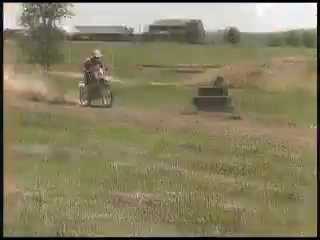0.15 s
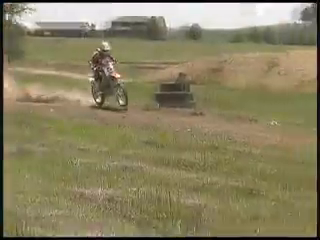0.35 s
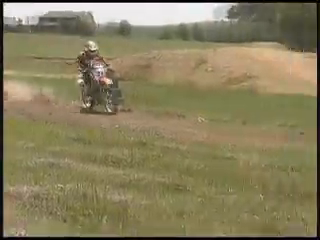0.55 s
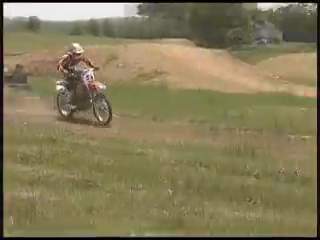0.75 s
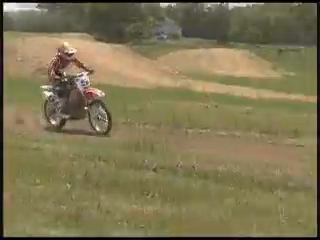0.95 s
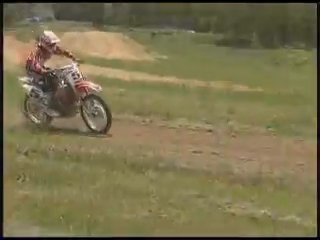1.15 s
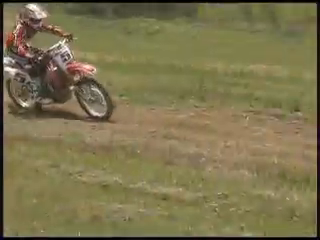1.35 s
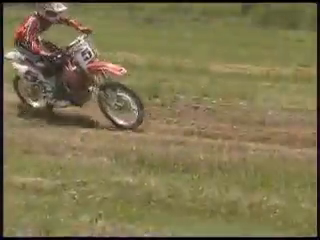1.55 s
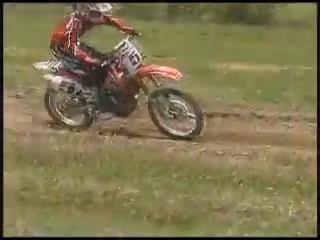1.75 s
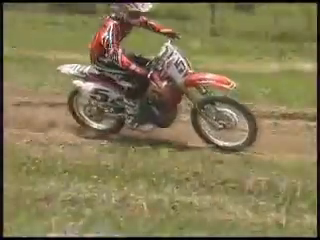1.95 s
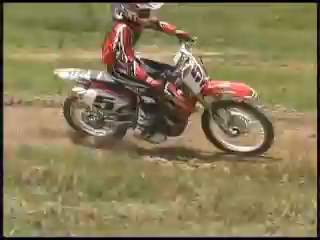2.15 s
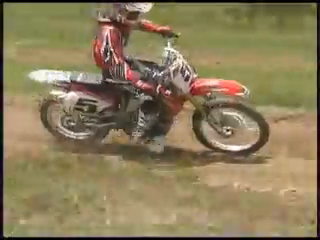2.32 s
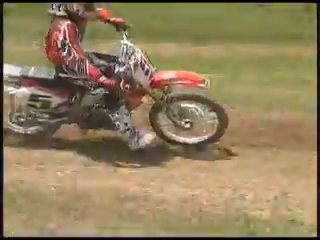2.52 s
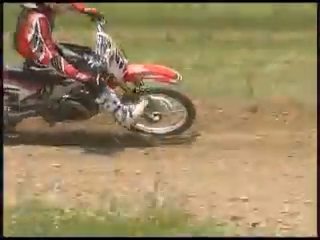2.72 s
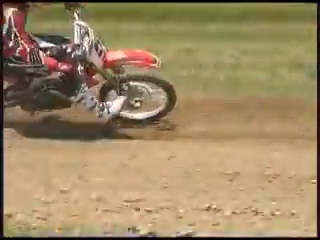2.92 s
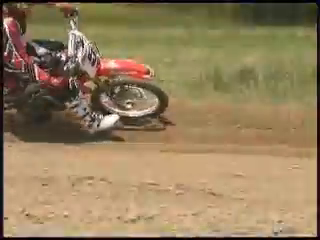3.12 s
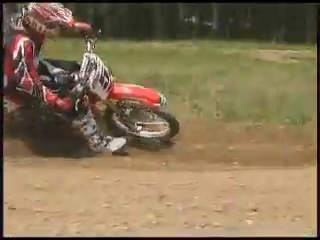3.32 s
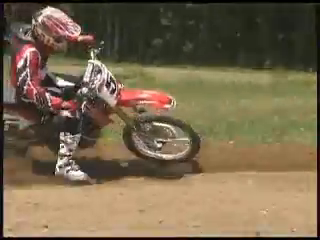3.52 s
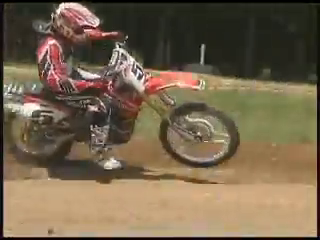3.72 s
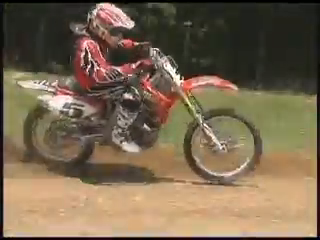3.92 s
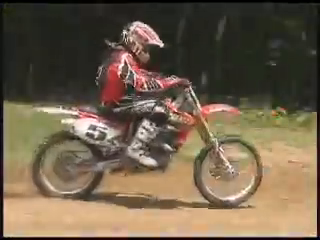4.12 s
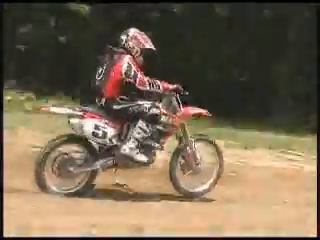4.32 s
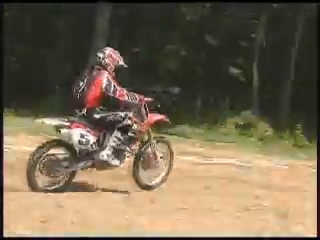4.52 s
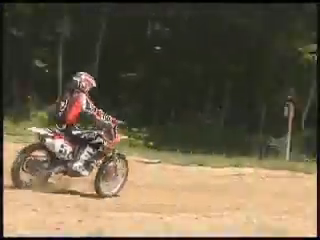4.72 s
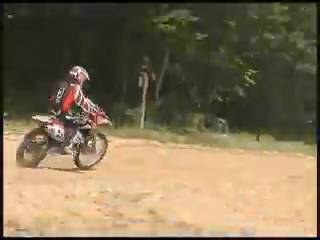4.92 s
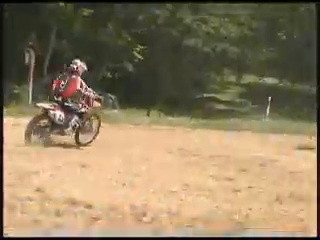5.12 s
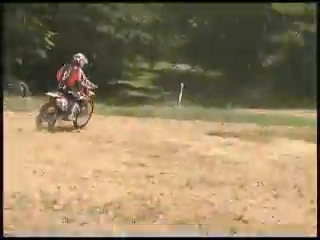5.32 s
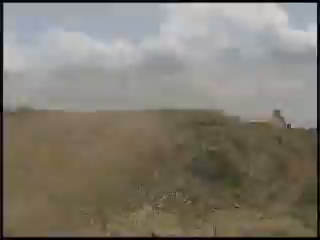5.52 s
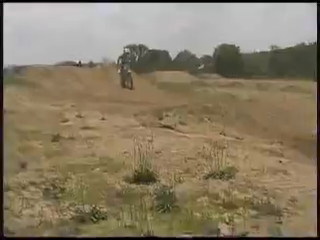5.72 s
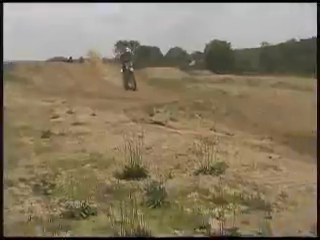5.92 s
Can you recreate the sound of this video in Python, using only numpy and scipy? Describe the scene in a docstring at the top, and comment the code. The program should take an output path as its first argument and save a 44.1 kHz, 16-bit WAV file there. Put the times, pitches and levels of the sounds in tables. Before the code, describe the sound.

A dirt bike engine snarls, drops to a low putter, then barks loudly close by as it pulls away outdoors.

```python
"""Dirt bike on the track

A four-stroke single idles under a shed; the boom fades as the bike comes on under throttle. It coasts
past with its chain slapping, opens up out of a turn, shuts off, then is suddenly close and pulling again.
Every firing is a thump in the exhaust pipe, a sharp bark of gas and a snarl from the tailpipe;
intake, chain and valve gear rush in between."""
import sys
import numpy as np
from scipy import signal
from scipy.fft import rfft, irfft, next_fast_len
from scipy.io import wavfile
from scipy.ndimage import uniform_filter1d

SR = 44100
rng = np.random.default_rng(int(sys.argv[2]) if len(sys.argv) > 2 else 0)


def pcm_store(signal):
    """Save signal as 16-bit PCM."""
    levels = np.round(np.clip(np.atleast_2d(signal), -1, 1) * 32767)
    wavfile.write(sys.argv[1], SR, levels.astype(np.int16).T)


N = 262836
TIME = np.arange(N) / SR

# Twists of the throttle. Each row: opening and shutting time in seconds, lift of the pipe's boom in Hz.
THROTTLE_TWISTS = [(-.05, 0.621, 43), (0.691, 0.807, 48), (2.788, 5.221, 46), (5.67, 6.1, 25)]
OPEN_S, SHUT_S = 0.0077, 0.035
COAST_FIRING_HZ = 50  # reference speed for coasting levels and pitch


def from_db(db):
    """Decibels to gain."""
    return 10 ** (np.asarray(db) / 20)


def in_time(rows):
    """The columns of a curve at every sample."""
    s, *columns = np.transpose(rows)
    return [np.interp(TIME, s, c) for c in columns]


def in_frequency(rows):
    """The columns of a spectrum at every bin of a transform padded to twice the length."""
    hz, *columns = np.transpose(rows)
    bins = np.fft.rfftfreq(next_fast_len(2 * N), 1 / SR)
    return [np.interp(np.log(bins + 1), np.log(hz + 1), c) for c in columns]


def filtered(x, response):
    """Apply a frequency response."""
    size = next_fast_len(2 * N)
    return irfft(rfft(x, size) * response, size)[..., :N]


def coloured(x, spectrum):
    """Give white sound a spectrum and keep its power."""
    gain = from_db(in_frequency(spectrum)[0])
    return filtered(x, gain / np.sqrt(np.mean(gain ** 2)))


def resonance(x, hz, width_hz):
    """Two-pole band-pass, gain 1 at the peak."""
    r = np.exp(-np.pi * width_hz / SR)
    feedback = [1, -2 * r * np.cos(2 * np.pi * hz / SR), r * r]
    return signal.lfilter(np.array([1, 0, -1]) * (1 - r * r) / 2, feedback, x + 1e-18)


def high_passed(x, edge_hz):
    """Roll off the lows below the edge."""
    return signal.sosfilt(signal.butter(4, edge_hz, "high", fs=SR, output="sos"), x)


def evened(x, size=3000):
    """Hold the short-term rms at 1."""
    power = uniform_filter1d(uniform_filter1d(x * x, size), size)
    return x / np.sqrt(np.maximum(power, 0) + 1e-14)


def shed_idle(firing_hz, level_db, top_hz, wash_db, wash_s, jitter_s=0.0029, count=10):
    """Slow firings boom on between slab and roof, each trailing a wash of reflections."""
    # Pipe and shed booming together. Each row: pitch in Hz, width in Hz, gain in dB.
    shed_modes = [(54.7, 7.8, -7), (109, 15, -8), (124.4, 15, 6), (159, 13, -30), (240, 25, -9.5)]
    starts = 0.005 + np.arange(count) / firing_hz + jitter_s * rng.standard_normal(count)
    fade = np.interp(starts, [0.065, 0.33], [1, 0])
    pulses = np.zeros(N)
    pulses[(np.abs(starts) * SR).astype(int)] = from_db(level_db) * fade
    wash = signal.lfilter([1], [1, -np.exp(-1 / (wash_s * SR))], pulses + 1e-18)
    pulses = pulses + from_db(wash_db) * wash * rng.standard_normal(N)
    boom = sum(from_db(db) * resonance(pulses, hz, width) * SR / (2 * np.pi * width)
               for hz, width, db in shed_modes)
    return signal.sosfilt(signal.butter(4, top_hz, fs=SR, output="sos"), boom)


def throttle():
    """0 shut, 1 open: it snaps open and closes a little slower."""
    return sum(np.clip(np.minimum((TIME - opens) / OPEN_S, (shuts - TIME) / SHUT_S) + .5, 0, 1)
               for opens, shuts, _ in THROTTLE_TWISTS)


def by_throttle(shut, wide_open):
    """Blend a quantity between coasting and pulling."""
    return shut + throttle() * (wide_open - shut)


def wheelspin():
    """The rear wheel breaks loose and the engine flares."""
    # Each row: centre in seconds, extra firings per second, width in seconds.
    flares = [(0.456, 8.0, 0.015), (0.578, 16.7, 0.028), (0.685, 11.4, 0.031), (3.343, 11.3, 0.043),
              (4.913, 10.8, 0.033), (5.111, 10.0, 0.033)]
    return sum(extra * np.exp(-.5 * ((TIME - s) / width) ** 2) for s, extra, width in flares)


def firing_rate():
    """Firings per second, wheelspin included."""
    # Engine speed while the tyre grips. Each row: time in seconds, firings per second.
    revs = [(0.0, 76.04), (0.812, 83.97), (0.904, 61.38), (1.459, 41.06), (1.888, 30.91), (1.956, 36.18),
            (2.328, 27.13), (2.739, 32.97), (2.885, 43.77), (3.115, 41.06), (3.359, 68.52), (3.61, 60.33),
            (3.854, 66.6), (4.178, 62.18), (4.351, 68.75), (5.179, 69.15), (5.345, 51.56), (5.675, 40.08),
            (5.677, 74.0), (5.83, 63.9), (5.96, 66.2)]
    return in_time(revs)[0] + wheelspin()


def engine_cycles():
    """Running count of four-stroke cycles."""
    # The bike's two entrances. Each row: time in seconds, starting point in the cycle from 0 to 1.
    entrances = [(0, .6), (5.675, .5)]
    cycles = np.cumsum(firing_rate()) / SR
    for s, phase in entrances:
        first = round(s * SR)
        cycles[first:] += phase - cycles[first] % 1
    return cycles


def firings(cycles, jitter_s):
    """Samples at which the cylinder fires, once every cycle."""
    at = np.flatnonzero(np.diff(np.floor(cycles)) > 0)
    return np.clip(at + (jitter_s * SR * rng.standard_normal(len(at))).astype(int), 0, N - 1)


def per_firing(cycles):
    """A new random value every cycle, joined by straight lines."""
    values = rng.standard_normal(int(cycles.max()) + 2)
    return np.interp(cycles, np.arange(len(values)), values)


def position():
    """Doublings of the distance from 10 m, and how far the tailpipe faces the microphone."""
    # Each row: time in seconds, distance in metres, tailpipe facing us from 0 to 1.
    path = [(0, 10, 0.6), (.8, 22.2, 0.03), (1.5, 10.06, 0.15), (2.7, 5.2, 0), (3.2, 4.9, 0),
            (4.1, 10.5, 1), (4.8, 11, 0.9), (5.67, 18, 1), (5.68, 7.5, 0.1)]
    metres, behind = in_time(path)
    return np.log2(np.maximum(metres, 1) / 10), np.clip(behind, 0, 1)


def layer_level(layer, pulling_db, fall_db=5):
    """Level in dB: set by effort under throttle, by speed and distance when coasting."""
    # Each layer: level in dB, dB per doubling of speed, dB added when heard from behind.
    coasting = {"bark": (-31.5, -4, -2.1), "rush": (-28.5, 9.2, -9.5), "boom": (-36.5, -1, -2.6),
                "drone": (-44.5, 0.31, .5)}
    db, speed_db, behind_db = coasting[layer]
    far, behind = position()
    speed = np.log2(firing_rate() / COAST_FIRING_HZ)
    return by_throttle(db + speed_db * speed - fall_db * far + behind_db * behind, pulling_db)


def boom_pitch(rate, pulling_hz=127.6, coasting_hz=142, settle_s=0.72):
    """The pipe's boom jumps with each gush of hot gas and settles; coasting, it sinks with the speed."""
    lift = np.zeros(N)
    for opens, _, rise_hz in THROTTLE_TWISTS:
        settling = np.exp(-np.abs((TIME - opens) / settle_s) ** 3)
        lift = np.where(TIME > opens - OPEN_S, rise_hz * settling, lift)
    return by_throttle(coasting_hz * (rate / COAST_FIRING_HZ) ** 0.23, pulling_hz + lift)


def thump(cycles, lead_s, drone_hz, drone_q, bottom_hz, top_hz, smear_hz, burble_s=0.00064, count=12):
    """The harmonics of the gas pulses sweep through the pipe's two resonances, boom and drone."""
    # Exhaust note with the throttle open. Each row: time in seconds, boom in dB, drone in dB.
    exhaust_levels = [(0.36, -34.5, -37.5), (0.8, -42.5, -46), (2.8, -25.5, -35.5), (3.29, -24.5, -25),
                      (3.65, -35.5, -33.5), (3.9, -37.5, -43), (4.06, -38, -34), (4.37, -33.5, -40.5),
                      (5.15, -38, -35.5), (5.68, -30, -24), (5.96, -37.5, -29)]
    rate = firing_rate()
    burble = 1 - throttle()  # coasting, timing and pitch turn uneven
    turn = np.exp(2j * np.pi * (cycles + (lead_s + burble_s * burble * per_firing(cycles)) * rate))
    boom_hz = boom_pitch(rate) * (1 + 0.054 * burble * per_firing(cycles))
    boom_q = by_throttle(10.5, 5.2)  # it rings longer when little gas flows
    puff_db = by_throttle(-29, -12)
    boom, drone, wave = 0, 0, 1
    for k in range(1, count + 1):
        hz, wave = k * rate, wave * turn
        # the open end radiates little bass, the silencer swallows the upper harmonics
        partial = wave / np.sqrt((1 + (bottom_hz / hz) ** 8) * (1 + (hz / (top_hz + rate / 2)) ** 20))
        boom += (partial / (1 + 1j * boom_q * (hz / boom_hz - boom_hz / hz))).real
        if k == 1:
            # the firing rate itself puffs straight out of the pipe
            boom += from_db(puff_db) * (1j * partial).real
        # the silencer's chambers delay each overtone differently, smearing the pulse into a hum
        smeared = partial * np.exp(-1j * ((hz - drone_hz) / smear_hz) ** 2)
        drone += (smeared / (1 + 1j * drone_q * (hz / drone_hz - drone_hz / hz)) ** 2).real
    boom_db, drone_db = in_time(exhaust_levels)
    boom = from_db(layer_level("boom", boom_db)) * evened(boom)
    drone = from_db(layer_level("drone", drone_db)) * evened(drone)
    return boom - drone


def snarl(at, peaks, pitch_hz, width_hz, size=300):
    """The steep pressure front of each firing rings a tailpipe resonance that moves with the throttle."""
    age, out = np.arange(size) / SR, np.zeros(N + size)
    for i, gain, hz in zip(at, peaks, pitch_hz[at]):
        out[i:i + size] += gain * np.sin(2 * np.pi * hz * age) * np.exp(-np.pi * width_hz * age)
    return out[:N]


def bark(at, gains, memory, rise_s, hold_s, decay_s, tail_db, tail_s, size=900):
    """The opening valve lets out a burst of turbulence; each burst partly resembles the one before."""
    # Each row: frequency in Hz, relative level in dB.
    gas_spectrum = [(250, -55), (420, -17), (944, -11.5), (1520, -2.5), (1700, -4), (3050, -1.5),
                    (4700, -5), (5330, -8.5), (5790, -5.5), (6940, -10.5), (9840, -20), (11200, -37.5),
                    (11800, -139.5), (15300, -59), (22000, -120)]
    age = np.arange(size) / SR
    body = np.exp(-np.maximum(age - hold_s, 0) / decay_s)
    tail = from_db(tail_db) * np.exp(-age / tail_s)
    shape = (1 - np.exp(-age / rise_s)) * (body + tail)
    shape /= np.sqrt(np.sum(shape ** 2) / (.005 * SR))  # the energy of 5 ms at gain 1
    out, burst = np.zeros(N + size), rng.standard_normal(size)
    for i, gain, fresh in zip(at, gains, rng.standard_normal((len(at), size))):
        burst = memory * burst + np.sqrt(1 - memory ** 2) * fresh
        out[i:i + size] += gain * shape * burst
    return coloured(out[:N], gas_spectrum)


def rush(level_db, grain_db, size=130):
    """Intake, valve gear and tyres: a finely rattling hiss."""
    # Each row: frequency in Hz, relative level in dB.
    hiss_spectrum = [(290, -40), (500, -11), (642, -1), (1220, 1.5), (1810, -1), (2140, 1), (2350, 0),
                     (2720, 0), (3020, -1), (3970, 1.5), (5170, -2.5), (6890, -4.5), (8960, -11.5),
                     (10600, -19), (11500, -137), (15000, -79), (22000, -120)]
    grain = uniform_filter1d(rng.standard_normal(N), size) * np.sqrt(size)
    return coloured(rng.standard_normal(N) * from_db(level_db + grain_db * grain), hiss_spectrum)


def case_ring(clatter):
    """Engine cases and sprockets ring with the clatter."""
    # Each row: pitch in Hz, width in Hz, gain in dB.
    case_modes = [(1155, 68, -5), (2700, 360, -10), (4220, 1100, -11), (5800, 700, -11)]
    return sum(from_db(db) * resonance(clatter, hz, width) for hz, width, db in case_modes)


def jet_rumble(bark_db, spin):
    """The jet from the tailpipe flutters more the harder the engine works."""
    # Each row: frequency in Hz, relative level in dB.
    jet_spectrum = [(20, -2), (55, -2), (150, 3.5), (380, 1), (560, 0.5), (900, -5.5), (3000, -68)]
    level_db = 1.78 * bark_db + by_throttle(-27, -16) + .35 * spin
    return from_db(level_db) * coloured(rng.standard_normal(N), jet_spectrum)


def with_pops(at, blast):
    """Two stray firings join the train after the throttle shuts."""
    # Each row: time in seconds, strength in dB.
    pops = [(0.84, -19), (.856, -20)]
    pop_s, pop_db = np.transpose(pops)
    return np.append(at, (pop_s * SR).astype(int)), np.append(blast, from_db(pop_db))


def chain_slap():
    """On the overrun the slack chain rattles briefly along the swing arm."""
    # Each row: centre in seconds, level in dB, width in seconds.
    slaps = [(1.32, -28.5, 0.0075), (1.4, -30.5, 0.012), (1.44, -29, 0.0072), (2.247, -27.5, 0.0097),
             (2.287, -30.5, 0.016), (2.347, -27.5, 0.016), (2.403, -24.5, 0.0058)]
    # Each row: frequency in Hz, relative level in dB.
    rattle_spectrum = [(700, -22), (1500, 9.5), (4000, 17.5), (7000, 9), (11000, -38)]
    swell = sum(from_db(db) * np.exp(-.5 * ((TIME - s) / width) ** 2) for s, db, width in slaps)
    return coloured(rng.standard_normal(N) * swell, rattle_spectrum)


def passing_tone(x):
    """Growl, silencer ring, rasp and fizz swell and sink with distance and as the bike turns its tail."""
    # Each row: centre in Hz, width in Hz, gain in dB, dB per doubling of distance, dB added from behind.
    tone_bands = [(794, 760, -2.36, -4, 1.3), (1520, 1440, -.5, 0.35, 2.5), (2660, 1100, 0.35, 1.2, -0.5),
                  (6600, 40000, -3.5, -1, 2.7)]
    far, behind = position()
    for hz, width, db, far_db, behind_db in tone_bands:
        x = x + (from_db(db + far_db * far + behind_db * behind) - 1) * resonance(x, hz, width)
    return x


def level_dip(start_s, end_s, depth_db):
    """The level dips briefly before the last pull."""
    gate = 1. * ((TIME > start_s) & (TIME < end_s))
    return from_db(-depth_db * uniform_filter1d(gate, size=200))


def microphone(mid, direct_db, scatter_db, scatter_s, scatter_hz, size=4000):
    """Two close ports differ most in the low mids; sound scattered off the ground hits them unevenly."""
    # Each row: frequency in Hz, side gain in dB, side phase in radians.
    ports = [(60, -8, -1.65), (132, -3.5, -1.77), (249, -2.5, -1.4), (400, 3, -0.31), (524, 4.5, -1.2),
             (850, -6, -0.24), (1310, -7, 0.99), (1890, -10, 0.3), (4100, -22.5, -0.2), (10000, -35, -5)]
    side_db, phase = in_frequency(ports)
    echoes = rng.standard_normal(size) * np.exp(-np.arange(size) / (scatter_s * SR))
    scattered = signal.fftconvolve(mid, echoes / np.sqrt(np.sum(echoes ** 2)))[:N]
    scattered = high_passed(scattered, scatter_hz)  # long waves are not scattered
    arriving = from_db(direct_db) * mid + from_db(scatter_db) * scattered
    side = filtered(arriving, from_db(side_db) * np.exp(1j * phase))
    return np.array([mid + side, mid - side])


def scene():
    """One train of firings drives thump, snarl and bark; rush and rumble follow throttle and wheelspin."""
    # Effort with the throttle open. Each row: time in seconds, bark in dB, rush in dB, snarl in Hz.
    effort = [(0, -20, -28.5, 1230), (.33, -18.5, -31, 1230), (.44, -16.5, -28, 1740), (.6, -19, -29, 2540),
              (.8, -17, -26.5, 2940), (2.8, -15.5, -24.5, 1060), (3.15, -16, -22, 980),
              (3.3, -11, -23, 1640), (3.55, -12, -25.5, 1590), (3.86, -17, -27.5, 1340),
              (4.05, -13, -26, 1420), (4.8, -14.5, -29.5, 1700), (4.86, -12, -33, 2450),
              (5.06, -13, -32.5, 2840), (5.2, -15.5, -37, 2430), (5.68, -13.5, -19.5, 2220),
              (5.96, -15.5, -24.5, 2300)]
    bark_db, rush_db, snarl_hz = in_time(effort)
    spin = wheelspin()
    bark_db = layer_level("bark", bark_db) + 0.2141 * spin
    rush_db = layer_level("rush", rush_db) + 0.47 * spin
    snarl_hz = by_throttle(1320, snarl_hz) + 61 * spin
    cycles = engine_cycles()
    at = firings(cycles, jitter_s=.00006)
    burn = rng.standard_normal(len(at))  # combustion varies from cycle to cycle
    low = thump(cycles, lead_s=0.0022, drone_hz=246.8, drone_q=1.9,
                bottom_hz=64.5, top_hz=295, smear_hz=48)
    low *= from_db(1.35 * np.interp(np.arange(N), at, burn))
    blast = from_db(bark_db[at] + by_throttle(-0.5, 1.1)[at] * burn)
    at, blast = with_pops(at, blast)
    crack = snarl(at, blast * from_db(6.5), snarl_hz, width_hz=367)
    crack += bark(at, blast * from_db(-0.5), memory=0.49, rise_s=0.0011, hold_s=0.00067,
                  decay_s=0.0015, tail_db=-11, tail_s=0.0051)
    clatter = rush(rush_db - 1.6, grain_db=1.92) + chain_slap()
    clatter += case_ring(clatter)
    # small openings and parts radiate no low mids
    high = passing_tone(high_passed(crack, edge_hz=700) + high_passed(clatter, edge_hz=765))
    rumble = jet_rumble(bark_db, spin)
    idle = shed_idle(firing_hz=29.2, level_db=-14.5, top_hz=356, wash_db=-29.5, wash_s=0.027)
    mix = (low + high + rumble + idle) * level_dip(start_s=5.645, end_s=5.672, depth_db=12)
    return microphone(mix, direct_db=-7.0, scatter_db=1.0, scatter_s=0.024, scatter_hz=290)


def record(dry):
    """The loudest barks are flattened and the top is cut."""
    ceiling, cutoff_hz = 0.7, 11700
    limited = dry / (1 + (dry / ceiling) ** 6) ** (1 / 6)
    return signal.sosfilt(signal.ellip(10, .2, 80, cutoff_hz, fs=SR, output="sos"), limited)


dry = scene()
out = record(dry)
pcm_store(out)
```